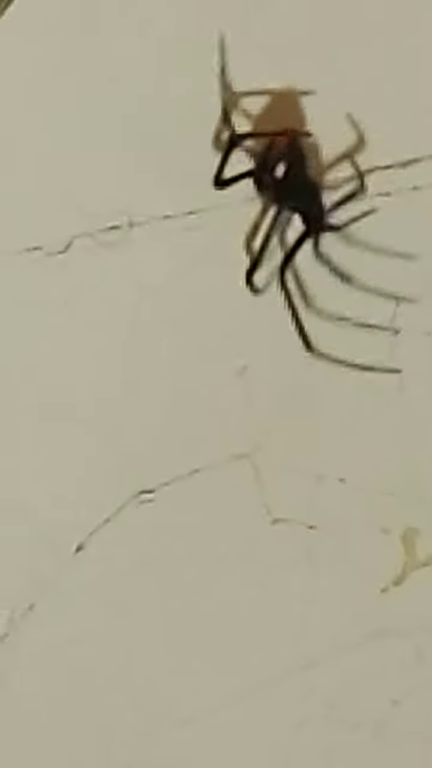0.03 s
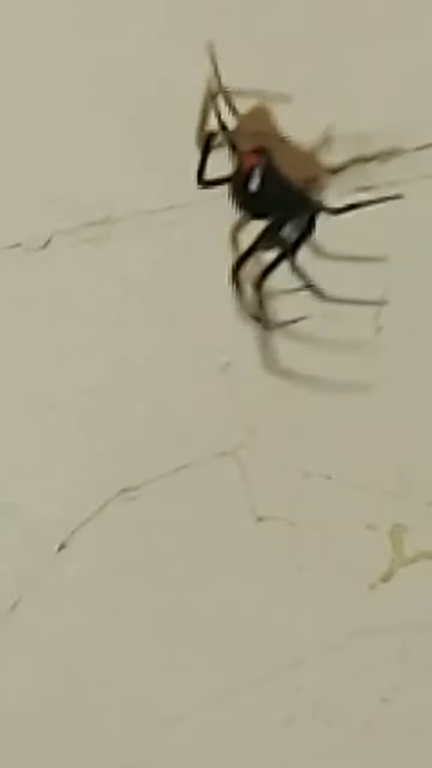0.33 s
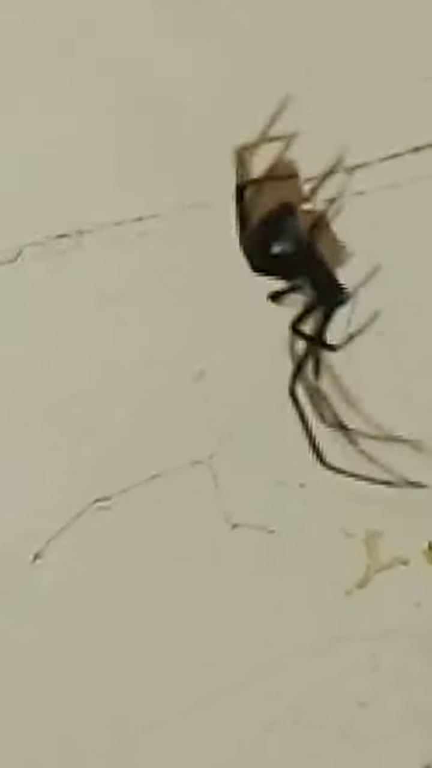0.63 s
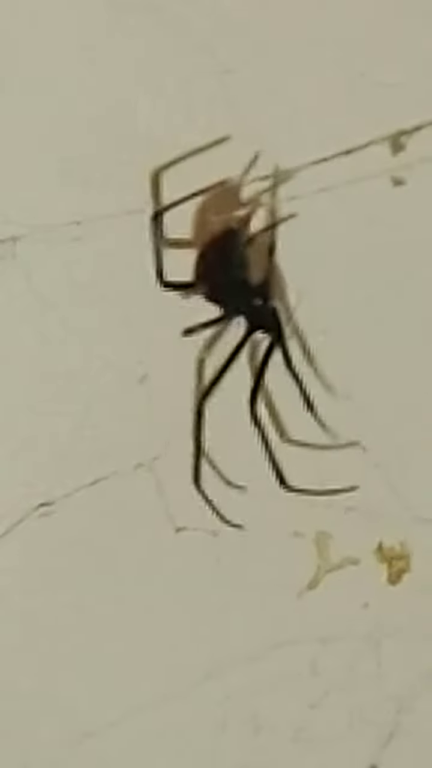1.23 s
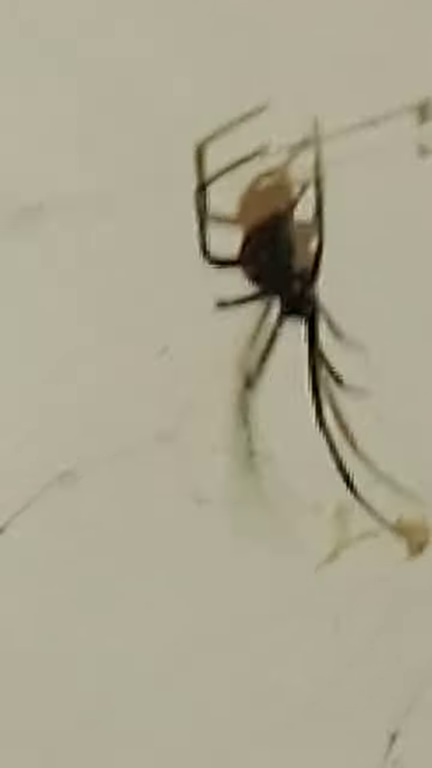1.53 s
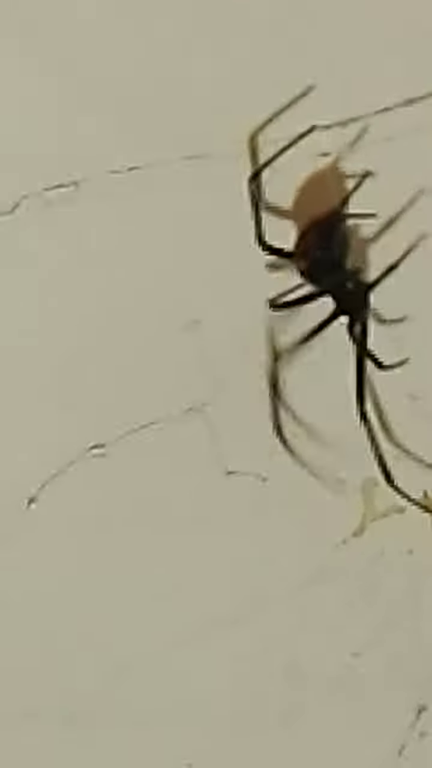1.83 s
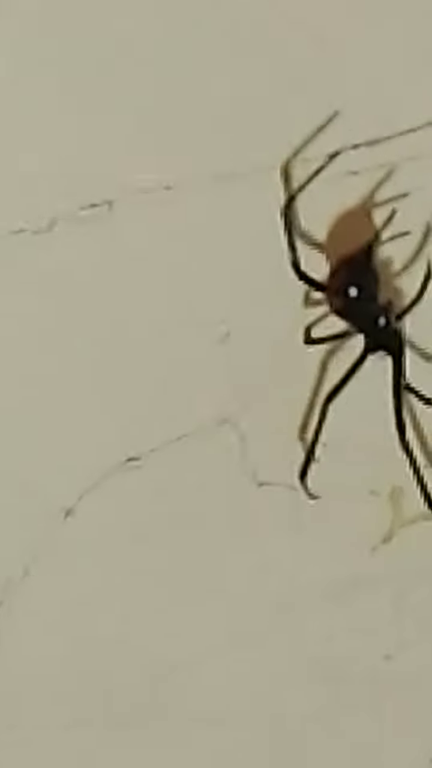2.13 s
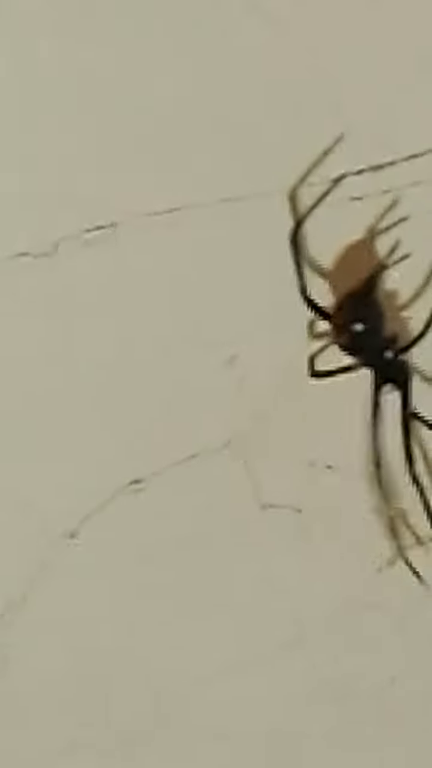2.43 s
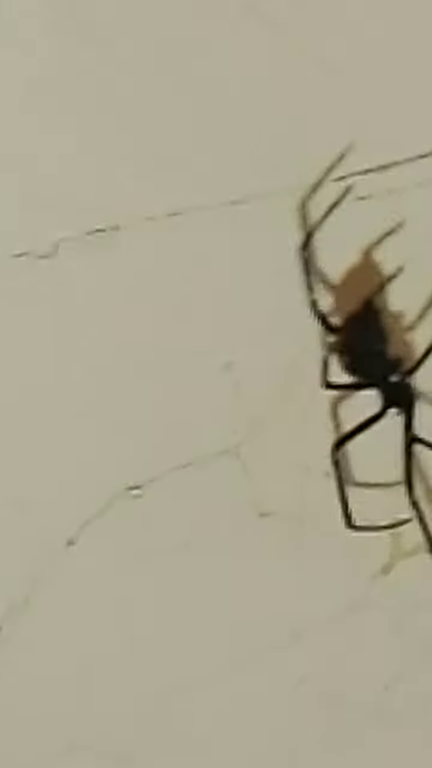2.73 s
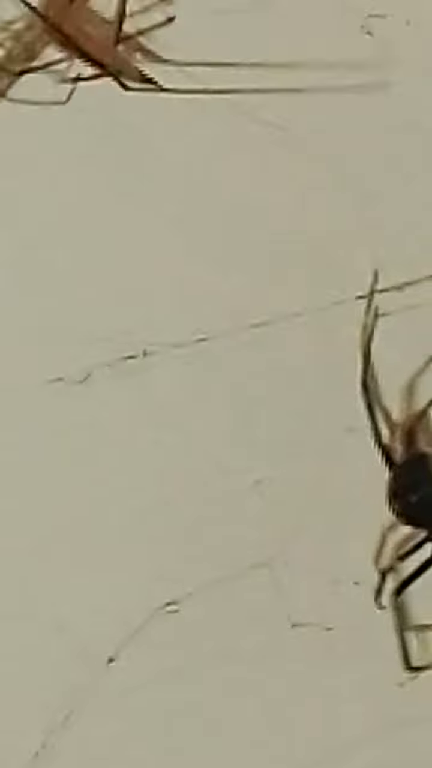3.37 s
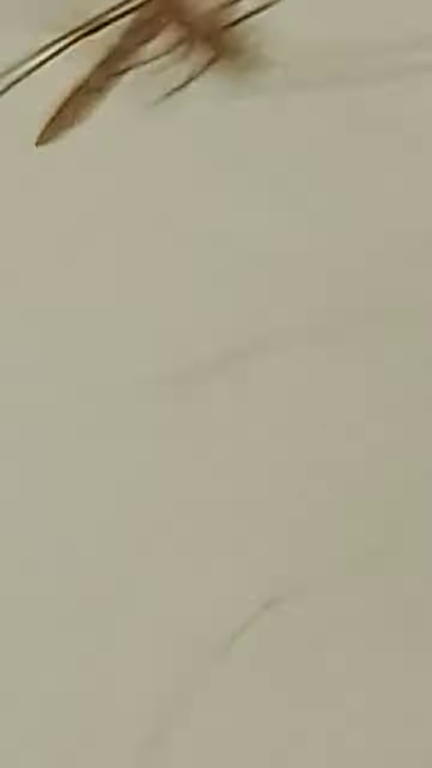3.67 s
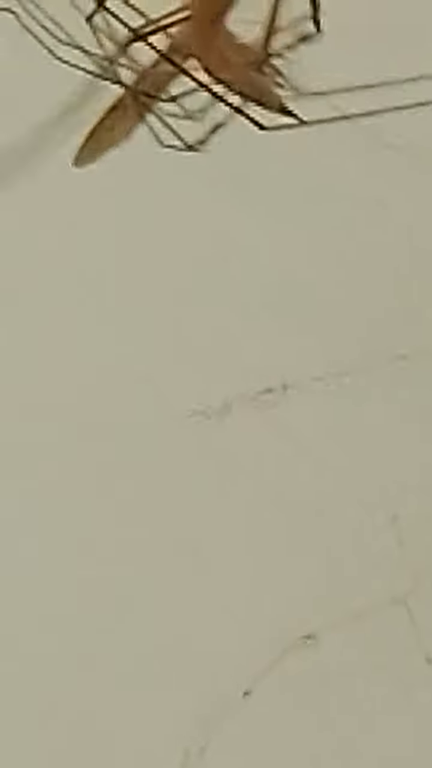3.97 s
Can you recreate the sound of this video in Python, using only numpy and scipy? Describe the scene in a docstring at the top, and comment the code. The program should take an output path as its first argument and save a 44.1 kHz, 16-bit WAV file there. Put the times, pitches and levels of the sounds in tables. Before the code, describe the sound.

Dull thumps and short clicks of fingers handling a camera in a quiet room.

```python
"""Fingers bump the case of a hand-held camera, heard at no distance through its own microphone.
Each push rocks the case in a dull, heavily damped thump, some with a short plastic rattle or a
thin fizz as the grip slips. Skin brushes the case, and a few sharper clicks ring briefly in the
quiet room. Under them lie the low rumble of the hand, a faint hiss and a fainter electrical whine."""
import sys
import numpy as np
from scipy import signal
from scipy.fft import rfft, irfft, next_fast_len
from scipy.io import wavfile
from scipy.ndimage import uniform_filter1d, map_coordinates

SR = 44100
rng = np.random.default_rng(int(sys.argv[2]) if len(sys.argv) > 2 else 0)


def wav_record(signal):
    """Record a signal, one row per channel, as 16-bit PCM in the file named by sys.argv[1]."""
    frames = np.transpose(np.atleast_2d(signal))
    bounded = np.clip(frames, -1, 1)
    # unit amplitude maps onto the largest positive 16-bit level
    quanta = np.round(bounded * 32767).astype(np.int16)
    wavfile.write(sys.argv[1], SR, quanta)


N = 176400


def amp(db):
    return 10 ** (np.asarray(db) / 20)


def unit(x):
    return x / np.sqrt(np.mean(x ** 2) + 1e-20)


def spectrum(points, size):
    """Gain per FFT bin from (frequency [Hz], level [dB]) points on a log axis."""
    hz, db = np.transpose(points)
    return amp(np.interp(np.log(np.fft.rfftfreq(size, 1 / SR) + 1), np.log(hz + 1), db))


def colour(x, points):
    """x shaped by the given spectrum."""
    size = next_fast_len(len(x) + 8192)
    return irfft(rfft(x, size) * spectrum(points, size), size)[:len(x)]


def noise(points, size):
    """Coloured noise of rms 1."""
    return unit(colour(rng.standard_normal(size), points))


def snap(points, size):
    """The shortest causal pulse with the given spectrum, peak 1."""
    cepstrum = irfft(np.log(spectrum(points, size)))
    cepstrum[1:size // 2] *= 2  # fold to minimum phase
    cepstrum[size // 2 + 1:] = 0
    pulse = irfft(np.exp(rfft(cepstrum)))
    return pulse / np.abs(pulse).max()


def cut(x, hz, kind, order):
    """Causal low-pass or high-pass."""
    return signal.sosfilt(signal.butter(order, min(hz, SR / 2 - 1), kind, fs=SR, output="sos"), x)


def resonate(x, hz, q):
    """One damped resonance."""
    return signal.lfilter(*signal.iirpeak(hz, q, SR), x)


def narrow_noise(hz, q):
    """Noise of rms 1 in one steep-sided resonance."""
    return unit(resonate(resonate(rng.standard_normal(N), hz, q), hz, q / 2))


def wobble(rate):
    """A smooth random curve, rate knots a second."""
    return map_coordinates(rng.standard_normal(int(N * rate / SR) + 4), [np.arange(N) * rate / SR])


def patchy(x, depth_db):
    """x with a random gain that drifts over frequency and time, at rms 1."""
    frames = signal.stft(x, nperseg=1024)[2]
    drift = uniform_filter1d(rng.standard_normal(frames.shape), size=5, axis=0)
    drift = unit(uniform_filter1d(drift, size=9, axis=1))
    return unit(signal.istft(frames * amp(depth_db * drift), nperseg=1024)[1][:len(x)])


def add(track, s, sound):
    """Mix a sound into the track at time s."""
    part = track[round(s * SR):][:len(sound)]
    part += sound[:len(part)]


def whine(hz=8464, db=-104):
    """A very faint, steady electrical tone."""
    t = np.arange(N) / SR
    return amp(db) * np.sin(2 * np.pi * hz * t)


# Spectrum of the noise floor: (frequency [Hz], relative level [dB])
HISS_SPECTRUM = [(260, -42), (450, -14), (650, -5), (1100, -7), (1500, -2.5), (2030, -4.5), (2530, -11.5),
                 (5410, -11.5), (8090, -25), (13400, -26.5), (15800, -11)]

def hiss():
    """The quiet room and the microphone's own noise."""
    return amp(-75) * patchy(noise(HISS_SPECTRUM, N), depth_db=2.5)


# Course of the hand's rumble: (time [s], level [dB])
HAND_LEVEL = [(0.0, -66), (0.28, -64), (0.72, -69), (1.02, -67), (1.19, -60.5), (1.55, -60.5), (2.34, -64),
              (2.46, -69), (2.74, -68.5), (3.43, -64.5), (3.6, -60.5), (3.82, -68.5), (4.0, -61)]
# Spectrum of the rumble: (frequency [Hz], relative level [dB])
RUMBLE_SPECTRUM = [(20, -21.5), (55, -18), (85, -4.5), (170, -4.5), (310, -11), (450, -21.5), (900, -37.5),
                   (3000, -71)]
# Resonances of the held camera: (frequency [Hz], Q, level [dB re HAND_LEVEL])
CAMERA_MODES = [(80.4, 5.5, -5), (152.2, 4.1, -5)]

def hand_rumble(swing_db=4):
    """Handling noise at the microphone: a restless rumble, each resonance swelling by itself."""
    rumble = amp(-7 + swing_db * wobble(rate=10)) * noise(RUMBLE_SPECTRUM, N)
    for hz, q, db in CAMERA_MODES:
        rumble += amp(db + swing_db * wobble(rate=10)) * narrow_noise(hz, q)
    return amp(np.interp(np.arange(N) / SR, *np.transpose(HAND_LEVEL))) * rumble


# Soft finger rubs: (crest time [s], level [dB], half length [s], centre [Hz])
FINGER_RUBS = [(0.619, -58.5, 0.0055, 748), (0.889, -75, 0.045, 2000), (1.664, -75, 0.072, 5700),
               (1.65, -70, 0.015, 4120), (1.915, -75, 0.05, 4150), (2.03, -73, 0.028, 1830),
               (2.57, -74, 0.05, 1790)]

def rubs():
    """Skin brushes the case close to the microphone: soft swells of noise in one resonance."""
    out, t = np.zeros(N), np.arange(N) / SR
    for s, db, half_s, centre_hz in FINGER_RUBS:
        out += amp(db) * np.exp(-((t - s) / half_s) ** 2) * narrow_noise(centre_hz, q=5.5)
    return out


# The grip slips just before a heavy bump: (crest time [s], level [dB], half length [s])
GRIP_SLIPS = [(2.429, -54.5, 0.013), (3.531, -42.5, 0.0065)]
# Spectrum of sliding skin: (frequency [Hz], relative level [dB])
FIZZ_SPECTRUM = [(500, 11), (3000, -12), (7000, -9), (10000, -25), (13500, -18.5), (15000, -4), (16000, 8)]

def slips():
    """Skin slides on the case: a brief, thin fizz, close up."""
    envelope, t = np.zeros(N), np.arange(N) / SR
    for s, db, half_s in GRIP_SLIPS:
        envelope += amp(db) * np.exp(-((t - s) / half_s) ** 2)
    return envelope * noise(FIZZ_SPECTRUM, N)


# Sharp clicks: (time [s], snap peak [dB], upper edge [Hz], crunch [dB re snap], room [dB re snap])
CASE_CLICKS = [(.6208, -50.5, 5200, 3, -2), (1.556, -49, 14000, 0.5, -6), (1.6108, -44, 8950, -3, -6),
               (1.6218, -30.5, 4700, -4, -13), (1.6228, -44, 8400, 6, 3), (1.672, -45, 7800, 7, 1.5),
               (1.8435, -43.5, 8200, 3.5, -5.5), (1.95, -54, 6840, 1.5, -1), (2.014, -52.5, 6460, -2, -2),
               (2.4504, -25.5, 3450, -18, -25), (2.4535, -54, 14800, -7, -22),
               (2.968, -40.5, 3540, 2, -6.5), (3.033, -48.5, 3360, 2.5, 7), (3.1846, -32, 3300, -16, -6),
               (3.53405, -28, 1800, -19, -35), (3.5333, -42, 6000, -5, -26)]
# Spectrum of the snap and its crunch: (frequency [Hz], relative level [dB])
CLICK_SPECTRUM = [(100, -2), (300, -1.5), (800, -0.5), (1350, 1.5), (1950, -7), (2450, -1), (3000, -9.5),
                  (4000, -10), (8000, -17.5), (16000, -7.5)]
# Spectrum of the room's answer: (frequency [Hz], relative level [dB])
ROOM_SPECTRUM = [(120, 8.5), (500, 5.5), (1500, 5.5), (2000, 1), (2500, 1), (3000, -3.5), (6300, 0),
                 (7100, -18.5), (16000, -22.5)]

def clicks(crunch_hold_s=0.0055, crunch_t60_s=0.016, room_t60_s=0.27):
    """A hard snap by the microphone, a crunch of grating plastic edges, then the room's answer."""
    out, t = np.zeros(N), np.arange(SR // 2) / SR
    crack = unit(snap(CLICK_SPECTRUM, len(t)))
    grating = amp(-60 * np.maximum(t - crunch_hold_s, 0) / crunch_t60_s)
    for s, db, edge_hz, crunch_db, room_db in CASE_CLICKS:
        crunch = patchy(noise(CLICK_SPECTRUM, len(t)), depth_db=3.5) * grating
        tail = patchy(noise(ROOM_SPECTRUM, len(t)), depth_db=3) * amp(-60 * t / room_t60_s)
        click = crack + amp(crunch_db) * unit(crunch) + amp(room_db) * unit(tail)
        snap_peak = np.abs(cut(crack, edge_hz, "low", order=10)).max()
        add(out, s, amp(db) * cut(click, edge_hz, "low", order=10) / snap_peak)
    return out


# Spectrum of loose plastic: (frequency [Hz], relative level [dB])
RATTLE_SPECTRUM = [(100, -13), (400, 8.5), (900, 2.5), (1350, -3.5), (1750, -11.5), (2600, -14),
                   (3600, -29.5), (4600, -37), (16000, -58.5)]

def rattle(size, hits_per_s=360, rise_s=0.0083, hold_s=0.0037, t60_s=0.067):
    """Loose plastic chatters just after a bump: random contacts in a wash of noise."""
    t = np.arange(size) / SR
    shake = np.minimum(t / rise_s, 1) * amp(-60 * np.maximum(t - rise_s - hold_s, 0) / t60_s)
    contacts = (rng.random(size) < hits_per_s / SR) * rng.choice([-1, 1], size)
    wash = amp(-2) * noise(RATTLE_SPECTRUM, size)
    return shake * unit(unit(colour(contacts, RATTLE_SPECTRUM)) + wash)


def thump(size, pitch_hz, q, contact_hz, knock_db):
    """A soft push rocks the case for a cycle or two; peak 1."""
    push = cut(signal.unit_impulse(size), contact_hz, "low", order=4)  # soft skin cuts the treble
    body = resonate(push, pitch_hz, q)
    body += amp(knock_db) * resonate(push, hz=470, q=3.2)  # hollow of the case
    body += amp(-14) * resonate(push, hz=107, q=7.3)  # the whole camera sways in the hand
    body -= amp(-20) * resonate(push, hz=1380, q=4)  # woody edge of the case wall
    body -= resonate(body, hz=2100, q=2.6)  # the microphone passes little here
    body = cut(body, hz=74.4, kind="high", order=4)  # the microphone's low cut
    return body / np.abs(body).max()


# Finger bumps: (time [s], thump peak [dB], pitch [Hz], Q, contact brightness [Hz],
# hollow knock gain [dB], rattle [dB re thump peak])
FINGER_BUMPS = [(0.6208, -39.5, 150, 1.5, 326, -32, -25.5), (1.0125, -43.5, 134, 3.3, 587, -37, -20.5),
                (1.217, -26, 160, 0.84, 920, -28, -30), (1.3333, -26, 160, 1.12, 980, -42, -23.5),
                (1.426, -30, 147, 1.8, 1000, -42, -22), (1.5543, -24.7, 111, 0.94, 530, -7.5, -33),
                (1.6101, -41.5, 150, 0.89, 990, -42, -12), (1.6225, -38, 130, 0.87, 1460, -27, -23),
                (1.6707, -39.5, 83.5, 0.73, 526, -30, -20.5), (1.7816, -47.5, 78.4, 1.9, 258, -15, -22),
                (1.8438, -38, 96, 0.94, 750, -28, -25.5), (1.948, -48.5, 84.6, 1.1, 223, -20, -44),
                (2.259, -41, 141, 1.8, 480, -35, -24.5), (2.3802, -40, 174, 2.2, 540, -28, -29),
                (2.4343, -28.5, 150, 0.93, 560, -21, -40), (2.4346, -17, 149, 1.44, 164, -30, -41),
                (2.4498, -22.5, 217, 1.4, 890, -22, -41), (2.9586, -30.5, 150, 2, 1150, -37, -15.5),
                (3.031, -44.5, 220, 2.4, 590, -27, -18.5), (3.1847, -37.5, 210, 1.2, 1130, -10, -38),
                (3.296, -56, 350, 0.44, 1000, -5, -12), (3.3681, -39, 137, 3.1, 900, -19, -18.5),
                (3.4743, -47.5, 130, 1, 560, -17, -17), (3.53372, -15.2, 144.2, 1.8, 640, -21.5, -55),
                (3.825, -46.5, 133, 4.7, 477, -11, -21), (3.915, -49, 169, 0.65, 259, -14, -28),
                (3.986, -45, 134, 1.8, 206, -0.5, -54)]

def bumps():
    """Fingers knock the case that holds the microphone: each a thump with its rattle."""
    out, size = np.zeros(N), SR // 4
    for s, db, pitch_hz, q, contact_hz, knock_db, rattle_db in FINGER_BUMPS:
        body = thump(size, pitch_hz, q, contact_hz, knock_db)
        add(out, s, amp(db) * (body + amp(rattle_db) * rattle(size)))
    return out


def scene():
    """Everything at the camera's one microphone, in a quiet room."""
    return (bumps() + clicks() + slips() + rubs() + hand_rumble() + hiss() + whine())[None]


def record(dry):
    """The camera keeps nothing above its band limit."""
    size, top_hz = next_fast_len(N + SR // 2), 15850
    passband = np.fft.rfftfreq(size, 1 / SR) < top_hz
    return irfft(rfft(dry, size) * passband, size)[:, :N]


dry = scene()
out = record(dry)
wav_record(out)
```